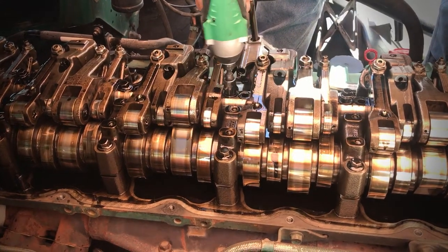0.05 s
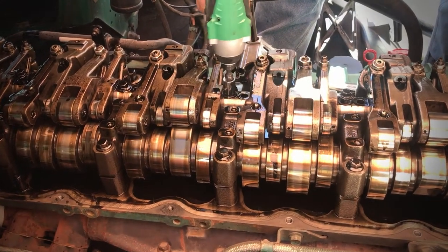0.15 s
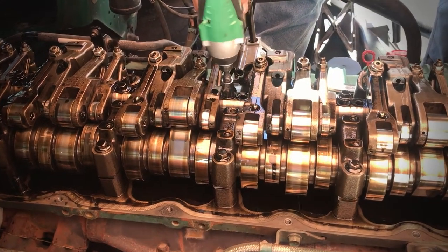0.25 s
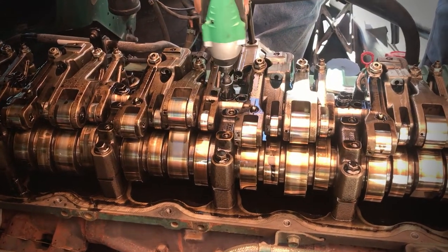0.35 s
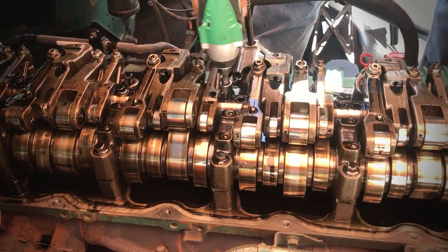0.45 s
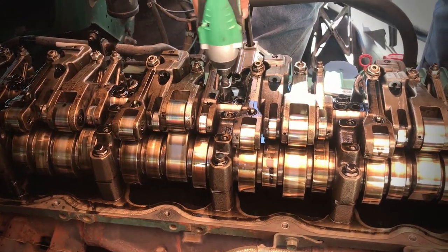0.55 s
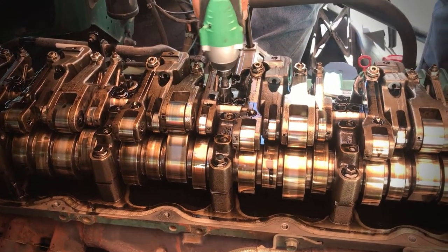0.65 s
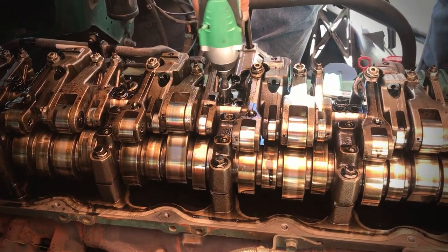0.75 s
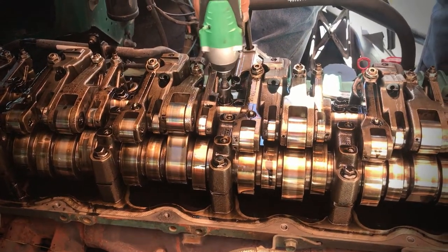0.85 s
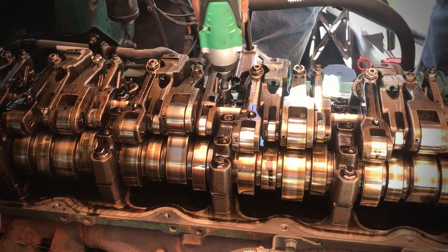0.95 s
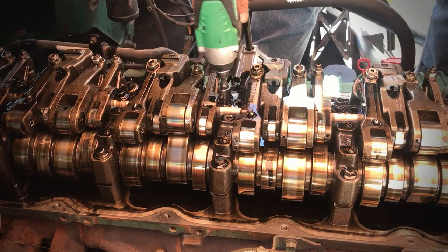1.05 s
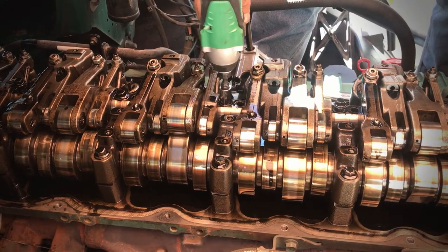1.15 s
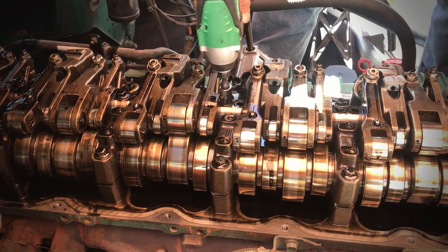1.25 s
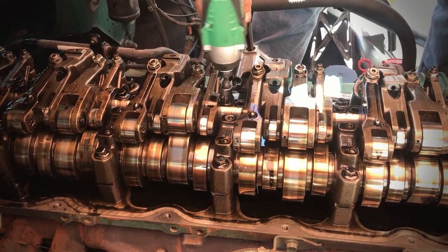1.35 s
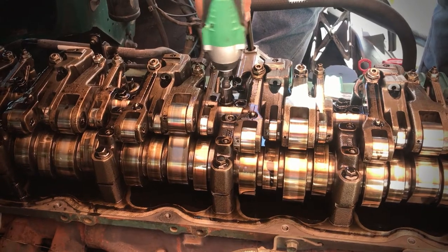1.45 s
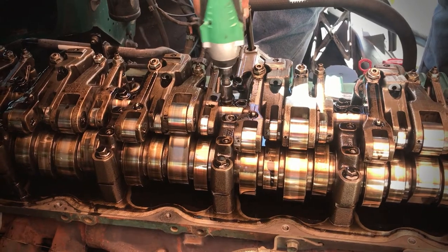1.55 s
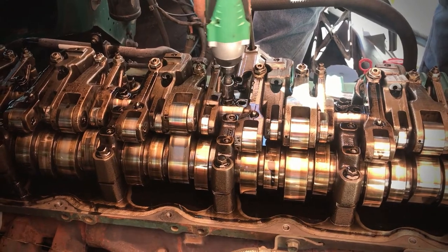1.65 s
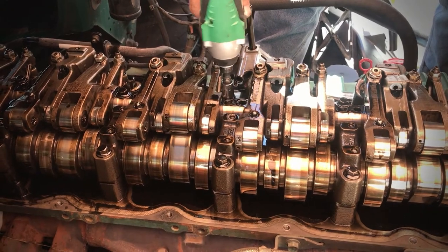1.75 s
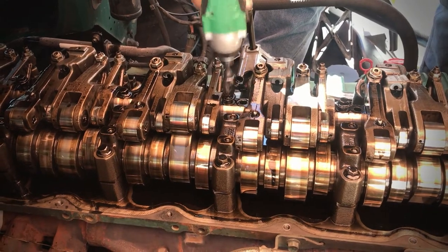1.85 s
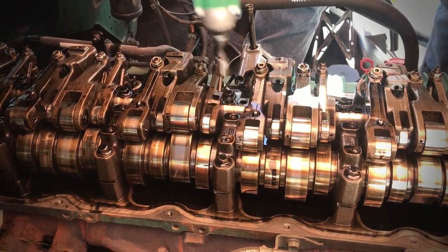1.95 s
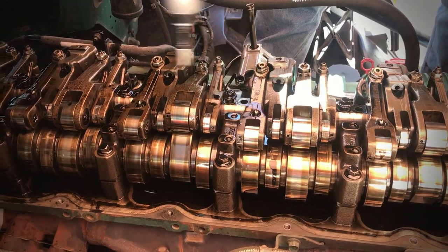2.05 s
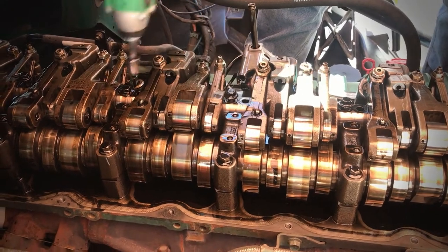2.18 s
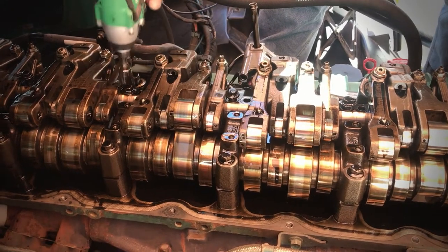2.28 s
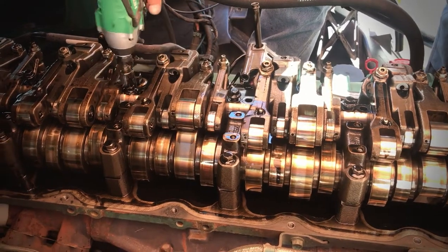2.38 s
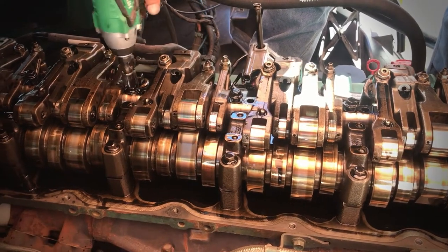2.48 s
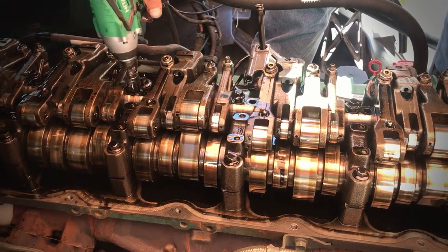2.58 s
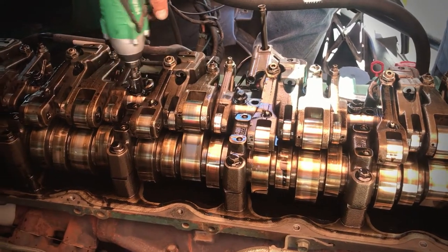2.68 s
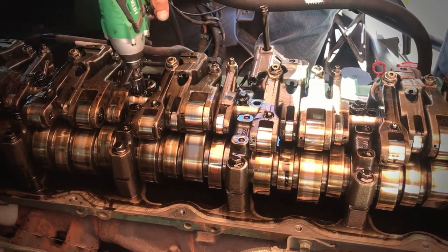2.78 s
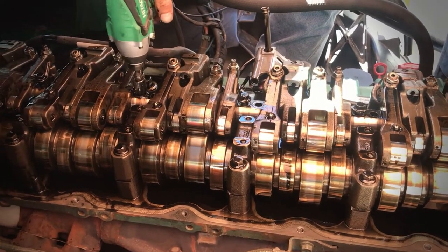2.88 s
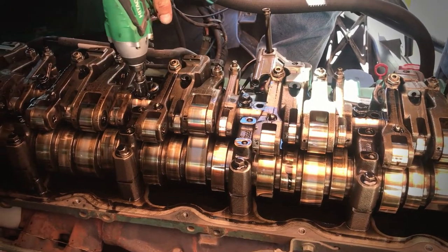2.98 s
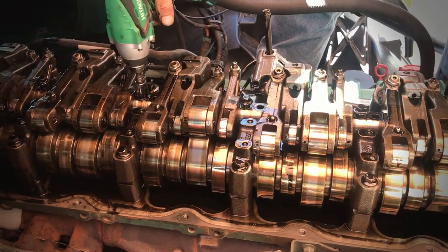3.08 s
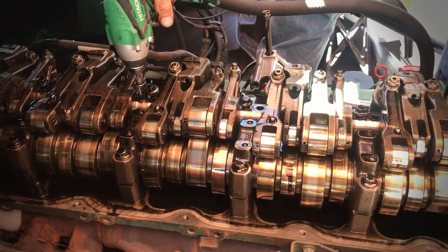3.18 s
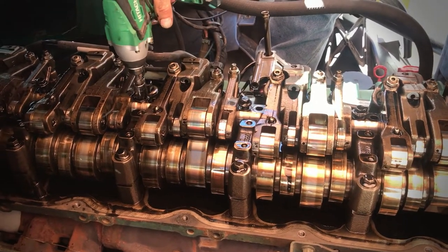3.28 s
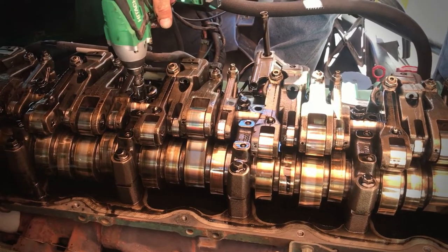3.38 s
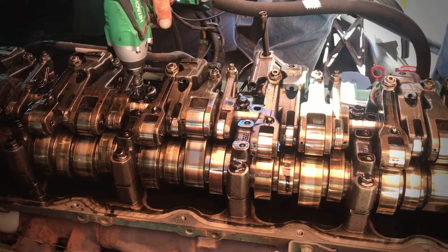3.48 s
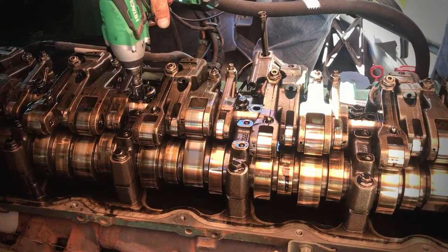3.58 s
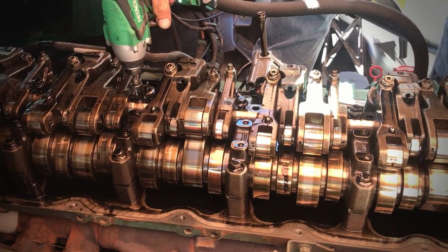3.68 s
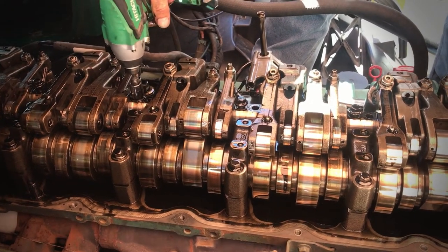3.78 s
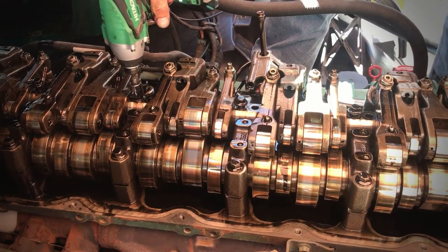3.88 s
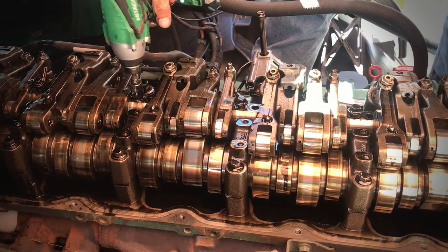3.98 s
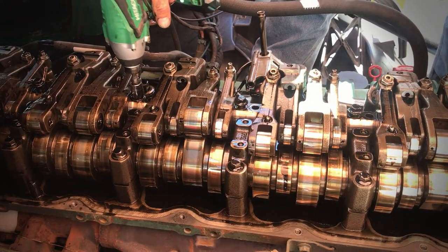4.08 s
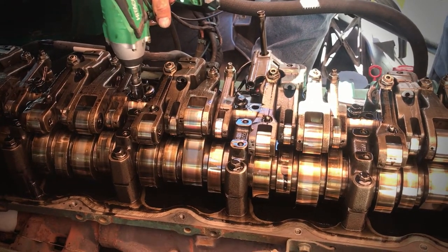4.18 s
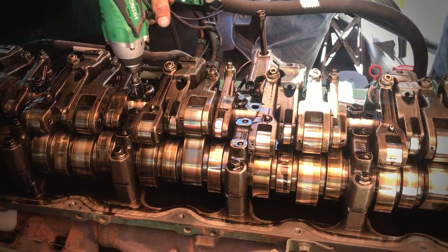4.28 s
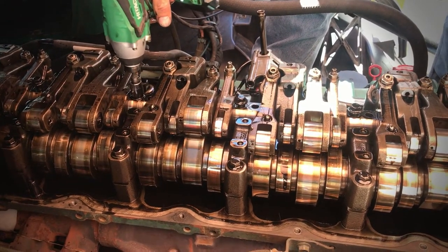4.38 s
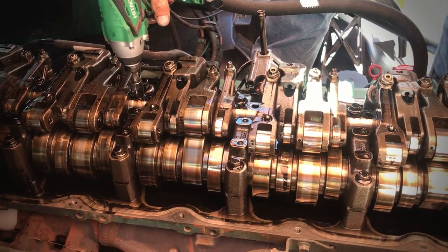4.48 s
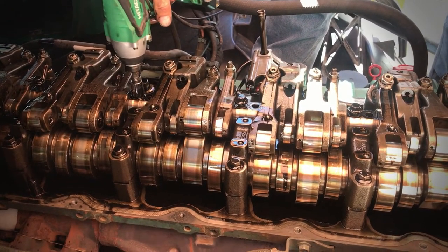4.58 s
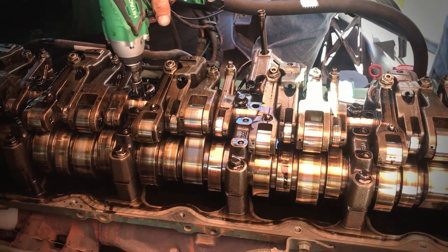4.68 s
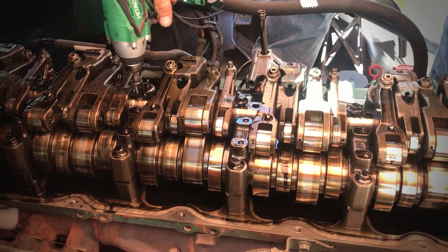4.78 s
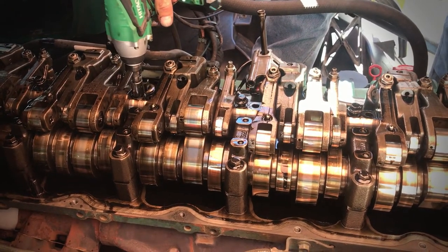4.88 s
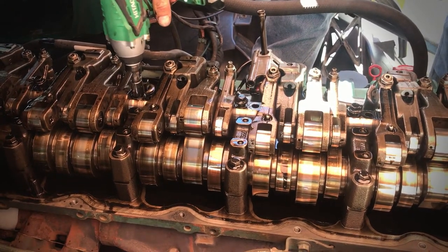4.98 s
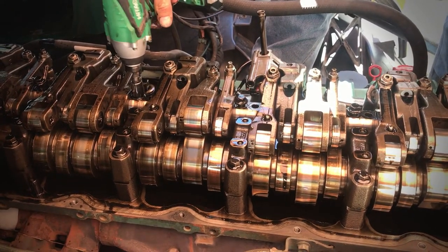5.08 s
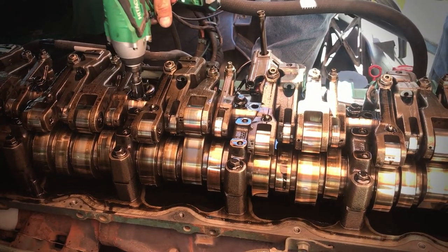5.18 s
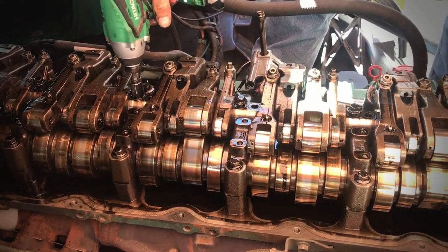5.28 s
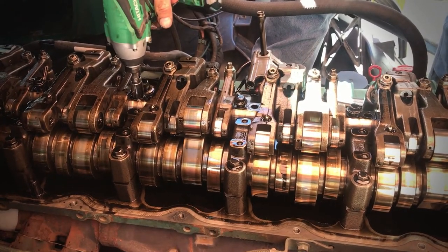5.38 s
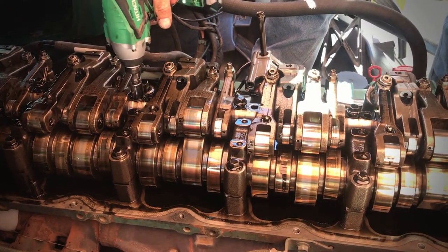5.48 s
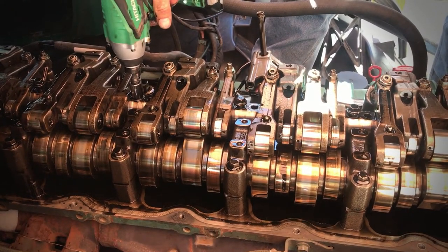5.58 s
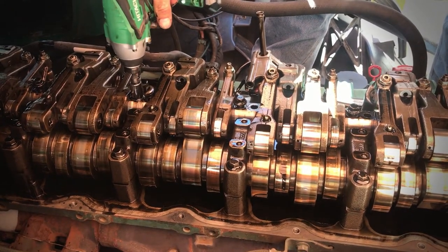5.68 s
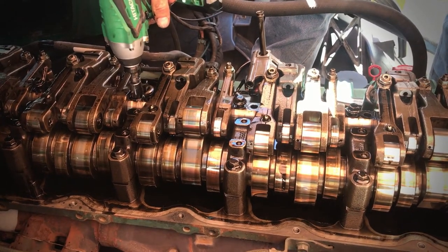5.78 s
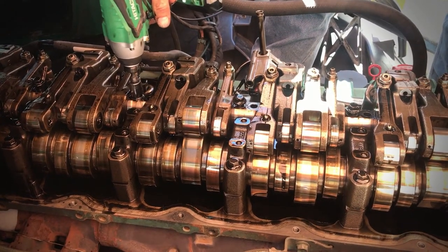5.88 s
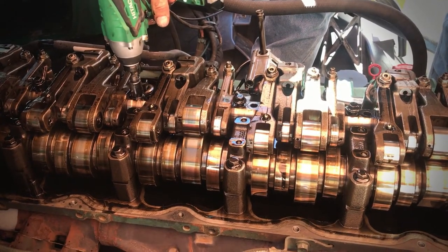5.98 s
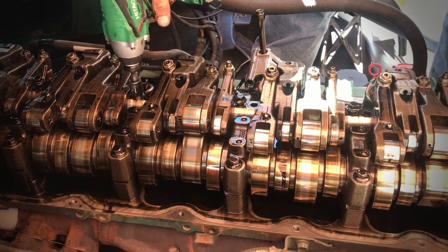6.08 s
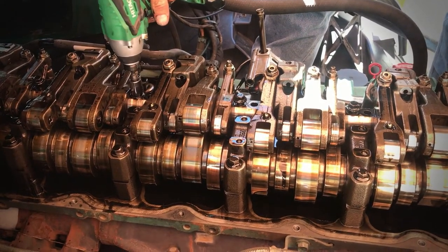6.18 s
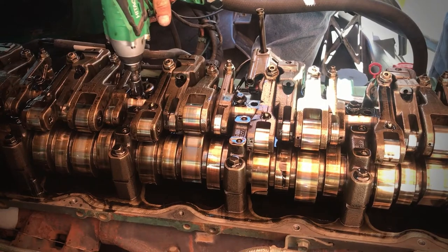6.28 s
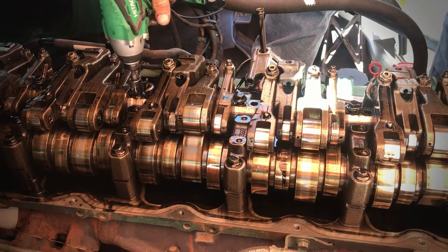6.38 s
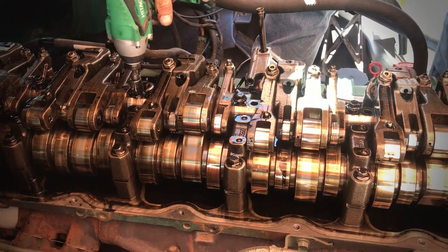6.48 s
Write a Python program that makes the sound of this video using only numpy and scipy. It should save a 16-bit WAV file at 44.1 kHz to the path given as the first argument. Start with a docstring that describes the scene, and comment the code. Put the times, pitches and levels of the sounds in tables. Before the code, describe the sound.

An impact wrench loosens two steel bolts on an engine, heard from nearby. A quick rev and socket rattle lead into several short bursts of fast, ringing hammering and a free whirr that winds down. The socket clinks onto the next bolt, and the hammering resumes in bursts and longer stretches. Occasional low thumps overload the microphone, above a quiet workshop rumble and hush.

```python
"""A short motor rev and the clatter of a loose socket open into the hammering of a cordless impact wrench.
It loosens two bolts on the open head of a diesel engine, above the low rumble of a workshop.
Each trigger pull spins up the motor; the hammer then strikes about 45 times a second, the socket
rebounds on the bolt head, and every contact excites the damped modes of the steel.
The first bolt spins free, the socket clinks over to the second, and a long run follows."""
import sys
import numpy as np
from scipy import signal
from scipy.fft import rfft, irfft
from scipy.io import wavfile
from scipy.ndimage import uniform_filter1d

SR = 44100
rng = np.random.default_rng(int(sys.argv[2]) if len(sys.argv) > 2 else 0)


def wav_out(sig):
    """Save sig, one row per channel (or a flat mono array), as 16-bit PCM at SR to the path in sys.argv[1]."""
    wavfile.write(sys.argv[1], SR, np.round(np.clip(np.atleast_2d(sig).T, -1, 1) * 32767).astype(np.int16))


N = 288795
TIME = np.arange(N) / SR
TAIL = int(.3 * SR)   # samples in the sound of one contact
TAIL_TIME = np.arange(TAIL) / SR
CUTOFF_HZ = 15950

# Trigger pulls under load. Each row: time at full speed and time of release in seconds, whirr level in dB.
TRIGGER_PULLS = [(0.318, 0.415, -22), (0.566, 0.705, -21), (0.779, 0.933, -22), (1.057, 1.23, -25.5),
                 (1.324, 1.452, -24.5), (2.642, 2.69, -36), (2.849, 2.948, -16), (3.082, 3.257, -19.5),
                 (3.362, 3.559, -22), (3.633, 4.977, -23.5), (5.066, 5.221, -20.5), (5.321, 5.429, -19.5),
                 (5.57, 6.6, -26)]
# Unbroken bursts of hammering. Each row: first and last blow in seconds, force in dB.
HAMMER_BURSTS = [(0.347, 0.42, 2), (.562, .61, -2.5), (0.634, 0.703, -0.5), (.801, 0.846, -2),
                 (.87, 0.913, -1), (1.072, 1.144, -0.5), (1.166, 1.203, -1), (1.351, 1.368, 4),
                 (1.396, 1.419, -1.5), (2.871, 2.939, 3), (3.081, 3.255, 1), (3.385, 3.553, 1.5),
                 (3.7, 3.873, -.5), (3.908, 3.99, 0), (4.012, 4.122, 0), (4.151, 4.192, -2.5),
                 (4.225, 4.271, -2.5), (4.293, 4.441, 0), (4.471, 4.697, -2.5), (4.733, 4.952, 1),
                 (5.055, 5.103, 0), (5.123, 5.212, 0), (5.329, 5.4, 1), (5.416, 5.458, -0.5),
                 (5.581, 5.787, .5), (5.855, 6.132, -.5), (6.156, 6.348, -0.5), (6.374, 6.463, -3.5),
                 (6.481, 6.54, -2)]
# Spectrum of the gear whirr. Each row: frequency in Hz, relative level in dB.
GEAR_SPECTRUM = [(100, -31), (450, -10), (800, 2.5), (1300, 11.5), (2200, 1.5), (3800, 3), (6000, -1.5),
                 (10000, -8.5), (16000, -16.5)]


def from_db(db):
    """Amplitude grows tenfold with every 20 dB."""
    return 10 ** (np.asarray(db) / 20)


def decay(t60):
    """Exponential damping: a fall of 60 dB in t60 seconds."""
    return 1000 ** (-TAIL_TIME / t60)


def add(track, s, sound):
    """Superposition: a sound adds to the track from s seconds on."""
    start = int(np.clip(s * SR, 0, N - 1))
    track[start:start + len(sound)] += sound[:N - start]


def colour(x, spectrum, modes=(), tilt_db=0):
    """Source and filter: a smooth spectrum with resonance peaks and a tilt per octave, at unit power."""
    size = 8192
    hz = np.maximum(np.fft.rfftfreq(size, 1 / SR), 1)
    points, levels = np.transpose(spectrum)
    db = np.interp(np.log(hz), np.log(points), levels) + tilt_db * np.log2(hz)
    db += sum(lift / (1 + (2 * (hz - centre) / width) ** 2) for centre, width, lift in modes)
    gain = from_db(db) / np.sqrt(np.mean(from_db(db[hz < CUTOFF_HZ]) ** 2))
    cepstrum = irfft(np.log(gain))[:size // 2]
    cepstrum[1:] *= 2   # minimum phase: nothing rings before its cause
    response = irfft(np.exp(rfft(cepstrum, size)))[:size // 2]
    return signal.fftconvolve(x, response)[:N]


def workshop(rumble_gain_db, bump_db, hush_db):
    """Filtered noise: a low rumble and the room's hush; handling the tool adds a rustle and a bump."""
    # Course of the rumble. Each row: time in seconds, relative level in dB.
    rumble_course = [(0.0, -40), (0.07, -28.5), (0.36, -44.5), (0.87, -44.5), (1.66, -45), (1.88, -40.5),
                     (2.68, -41), (3.21, -54), (3.43, -64), (3.94, -46), (4.07, -67), (5.62, -54),
                     (6.16, -49), (6.55, -47)]
    # Spectra of the rumble and of the rustle and hush. Each row: frequency in Hz, relative level in dB.
    rumble_spectrum = [(15, -39), (25, -10), (43, -4.5), (114, -2), (172, -12.5), (274, -18), (299, -20),
                       (394, -13), (500, -37), (650, -88), (1100, -120)]
    rustle_spectrum = [(150, -4), (400, 0), (700, -3.5), (1200, -4), (2500, -10.5), (5000, -15.5),
                       (9000, -26), (16000, -35.5)]
    # Shifts of the tool. Each row: middle and half length in seconds, level in dB.
    shifts = [(0.046, 0.067, -25), (1.8, 0.041, -39), (2.259, 0.039, -45), (5.548, 0.074, -40)]
    handling = sum(from_db(db) * np.exp(-((TIME - s) / half_s) ** 2) for s, half_s, db in shifts)
    rumble_db = np.interp(TIME, *np.transpose(rumble_course)) + rumble_gain_db
    low_level = from_db(rumble_db) + from_db(bump_db) * handling
    rumble = low_level * colour(rng.standard_normal(N), rumble_spectrum)
    rustle = (from_db(hush_db) + handling) * colour(rng.standard_normal(N), rustle_spectrum)
    return rumble + rustle


def loaded_motor(spin_up_s, coast_s, turn_hz, throb):
    """Amplitude modulation: the whirr of gears and socket swells with speed and throbs with each turn."""
    level = np.zeros(N)
    for on, off, db in TRIGGER_PULLS:
        fade = np.maximum(on - TIME, 0) / spin_up_s + np.maximum(TIME - off, 0) / coast_s
        level = np.maximum(level, from_db(db) * np.exp(-np.minimum(fade, 20)))
    throbbing = 1 + throb * np.sin(2 * np.pi * turn_hz * TIME)
    return colour(rng.standard_normal(N) * level * throbbing, GEAR_SPECTRUM)


def free_motor(mesh_hz, spin_up_s, coast_s, wobble, steepness, whirr_tilt_db):
    """Gear meshing: partials follow the speed, roughened by tooth play; the level grows steeply with it."""
    # Unloaded revs. Each row: pull and release in seconds, whine and whirr levels at full speed in dB.
    revs = [(0.003, 0.145, -37, -25), (1.505, 1.681, -28.5, -22)]
    # Partials of the whine. Each row: multiple of the mesh rate, relative level in dB.
    gear_orders = [(0.669, -12), (1, -3.5), (1.33, -16), (2, -11), (2.668, 1.5), (2.999, -5.5), (3.999, -8)]
    speed, whine_level, whirr_level, whine = np.zeros((4, N))
    for on, off, whine_db, whirr_db in revs:
        driven_s = np.maximum(np.minimum(TIME, off) - on, 0)
        rev = (1 - np.exp(-driven_s / spin_up_s)) * np.exp(-np.maximum(TIME - off, 0) / coast_s)
        speed += rev
        whine_level += from_db(whine_db) * rev ** steepness
        whirr_level += from_db(whirr_db) * rev ** steepness
    for multiple, order_db in gear_orders:
        play = uniform_filter1d(rng.standard_normal(N), size=80)
        hz = multiple * mesh_hz * speed * (1 + wobble * play / play.std())
        whine += from_db(order_db) * np.sin(2 * np.pi * np.cumsum(hz) / SR)
    whirr = colour(rng.standard_normal(N) * whirr_level, GEAR_SPECTRUM, tilt_db=whirr_tilt_db)
    return whine * whine_level + whirr


def blows(bursts, rate_hz=46.5, sag_db_per_s=10, ease_db=5, ease_s=.03):
    """An impulse train of (seconds, dB), weakening as the bolt gives and around each trigger release."""
    releases, out = np.array(TRIGGER_PULLS)[:, 1], []
    for first, last, db in bursts:
        for s in np.linspace(first, last, round((last - first) * rate_hz) + 1):
            easing = np.exp(-np.abs(releases - s).min() / ease_s)
            out.append((s, db - sag_db_per_s * (s - first) - ease_db * easing))
    return out


def thumps(sweep_hz, glide_s, lead_s, rise_s, fall_s, light_db, spread_db):
    """Downward chirps: short thumps whose highs arrive first, faint at every blow and loud at a few."""
    # Loud low falling thumps of the overloaded recorder, at scattered blows.
    # Each row: time in seconds, level in dB.
    loud = [(.35, -13.5), (.875, -17.5), (1.152, -18.5), (1.427, -23.5), (3.155, -21.5), (3.478, -22),
            (4.059, -25), (4.583, -21), (4.628, -21), (5.906, -16.5), (5.927, -22.5), (6.059, -26),
            (6.286, -20), (6.308, -18), (6.33, -15.5)]
    light = [(s, db + light_db + rng.uniform(-spread_db, spread_db)) for s, db in blows(HAMMER_BURSTS)]
    out, t = np.zeros(N), TAIL_TIME
    cycles = sweep_hz * glide_s * (1 - np.exp(-t / glide_s)) + 42.5 * t   # dives towards 42.5 Hz
    rise = np.exp(-((t - lead_s) / rise_s) ** 2)
    fall = np.exp(-np.abs(t - lead_s) / fall_s)
    thump = np.where(t < lead_s, rise, fall) * np.sin(2 * np.pi * cycles)
    for s, db in loud + light:
        add(out, s - lead_s, from_db(db) * thump)
    return out


def casing():
    """Periodic excitation: every blow shakes the tool's casing in the same way, giving a low buzz."""
    # Low modes of the casing. Each row: frequency in Hz, level in dB, 60 dB decay time in seconds.
    modes = [(287, -47, 0.18), (418, -41.5, 0.13), (707.4, -32.5, 0.078)]
    knock = sum(from_db(db) * decay(t60) * np.sin(2 * np.pi * hz * TAIL_TIME) for hz, db, t60 in modes)
    out = np.zeros(N)
    for s, _ in blows(HAMMER_BURSTS):
        add(out, s, knock)
    return out


def clanks():
    """Free vibration: socket and head ring in short, clear tones when they meet."""
    # Damped tones. Each row: start in seconds, frequency in Hz, level in dB, 60 dB decay time in seconds.
    tones = [(0.075, 1232, -16, 0.064), (1.781, 510, -32, 0.12), (1.779, 2900, -23, 0.055),
             (2.468, 933, -16.5, 0.033), (2.619, 3630, -25, 0.04), (2.627, 5400, -30, 0.046),
             (2.675, 997, -18, 0.036), (3.634, 1020, -6, 0.034), (3.725, 1273, -9, .09)]
    out, attack = np.zeros(N), 1 - decay(.013)
    for s, hz, db, t60 in tones:
        add(out, s, from_db(db) * attack * decay(t60) * np.sin(2 * np.pi * hz * TAIL_TIME))
    return out


def patchy(noise, patchy_db):
    """Modal weighting: each contact lands a little differently and so favours other bands."""
    knots_hz = np.geomspace(300, 16000, 24)
    knots_db = patchy_db * rng.standard_normal(len(knots_hz))
    gain = from_db(np.interp(np.fft.rfftfreq(TAIL, 1 / SR), knots_hz, knots_db))
    return irfft(rfft(noise) * gain / np.sqrt(np.mean(gain ** 2)), TAIL)


def steel(contacts, spectrum, modes, ring_t60, ring_db, room_t60, room_db,
          crack_tilt_db, ring_tilt_db, alike, patchy_db, crack_t60=.011):
    """Impact response: each contact gives a bright crack, a ring of dense modes and a short room tail."""
    cracks, rings = np.zeros((2, N))
    dense_modes = rng.standard_normal(TAIL)
    crack = decay(crack_t60) * (1 - decay(.0022))
    ring = from_db(ring_db) * decay(ring_t60) + from_db(room_db) * decay(room_t60)
    ring *= 1 - decay(crack_t60)   # builds as the crack dies
    for s, db, crack_db in sorted(contacts):
        # The modes shift as the socket creeps round.
        dense_modes = np.sqrt(alike) * dense_modes + np.sqrt(1 - alike) * rng.standard_normal(TAIL)
        add(cracks, s, from_db(db + crack_db) * crack * patchy(rng.standard_normal(TAIL), 2 * patchy_db))
        add(rings, s, from_db(db) * ring * patchy(dense_modes, patchy_db))
    return colour(cracks, spectrum, modes, crack_tilt_db) + colour(rings, spectrum, modes, ring_tilt_db)


def loose_socket(touches, gap_s, loss_db):
    """Inelastic collisions: the socket knocks singly, or rattles to rest after a free rev."""
    # Knocks and first touches of rattles. Each row: start in seconds, level in dB, crack offset in dB.
    knocks = [(.065, -5.5, 0), (.075, -8, -6), (.092, 0, -19), (.136, -10, -8), (.141, -3, 3),
              (.306, -6.5, -2), (.327, -2.5, 2), (.782, -9, -7), (1.04, -16, -3), (1.061, -13.5, 9.5),
              (1.228, -14.5, 8), (1.33, -5.5, -16), (1.474, -11.5, 7), (1.507, -17.5, 4.5),
              (1.777, -12, -8), (1.931, -22.5, -3.5), (2.456, -15, -4), (2.469, -17.5, 3), (2.619, -23, -6),
              (2.667, -21.5, -1), (2.85, -4.5, -8), (3.06, -13, -18), (3.36, -3.5, -17), (3.603, -14, 1),
              (3.609, -5, 3.5), (3.632, -11, 10), (3.65, -4, -1), (3.678, -2, -3), (5.043, -12, -16),
              (5.552, -28, 3), (5.816, -5.5, 0)]
    rattles = [(0.164, -9, 0), (1.788, -25, -15)]
    return knocks + [(s + k * gap_s, db - k * loss_db, crack_db)
                     for s, db, crack_db in rattles for k in range(touches)]


def hammer(bursts, jitter_s, uneven_db, rebound_s, rebound_db, settle_s, settle_db, scatter):
    """Elastic rebound: after each contact of hammer and anvil, the socket bounces once, then settles."""
    contacts = []
    times, forces = np.transpose(blows(bursts))
    run_ups = np.interp(np.diff(times, prepend=0), [.024, .035], [0, 1])
    for s, db, run_up, chance in zip(times, forces, run_ups, rng.standard_normal((len(times), 6))):
        # After a pause the blow is 2.5 dB harder and free of jitter.
        s += (1 - run_up) * jitter_s * chance[0]
        contacts.append((s, db + 2.5 * run_up + (1 - run_up) * uneven_db * chance[1], 0))
        for delay_s, offset_db, (timing, force) in [(rebound_s, rebound_db, chance[2:4]),
                                                    (settle_s, settle_db, chance[4:])]:
            contacts.append((s + delay_s * np.exp(scatter * timing), db + offset_db + uneven_db * force, 0))
    return contacts


def bolts(second_bolt_s):
    """Resonance: socket, bolt and head filter the impacts, with different modes on each bolt."""
    # Impact spectrum on each bolt. Each row: frequency in Hz, relative level in dB.
    first_spectrum = [(60, -7.5), (250, -26), (500, -8.5), (750, -2.5), (1050, 7), (1600, -1), (2200, -2),
                      (3000, -3), (4100, 5.5), (5500, -7.5), (9000, -4.5), (10500, -10), (13000, -5.5),
                      (16000, -13)]
    second_spectrum = [(60, -36.5), (250, -21), (400, -10), (580, -14), (800, -11), (970, 4.5),
                       (1250, -0.5), (1550, -9), (2300, -6), (4100, -6), (7300, -11), (9300, -6.5),
                       (10600, -14.5), (16000, -15.5)]
    # Resonances on each bolt. Each row: frequency in Hz, bandwidth in Hz, lift in dB.
    first_modes = [(1105, 13, 5), (1520, 64, 6.5), (1700, 96, 5.5), (3150, 200, 4.5), (4160, 120, 0),
                   (6630, 290, 4), (9120, 90, 5.5), (12900, 90, -23)]
    second_modes = [(724, 27, 9), (1234, 195, 5.2), (1748, 370, 10.1), (2780, 430, 3.7), (3940, 840, 5.2),
                    (4600, 150, 6.1), (5370, 59, 1.8), (5600, 300, 4.5), (6250, 450, 3.4), (9780, 210, 3.8),
                    (11460, 100, 4.7), (11620, 360, 7.3), (13060, 730, 7.2)]
    first = hammer([b for b in HAMMER_BURSTS if b[0] < second_bolt_s], jitter_s=.0007, uneven_db=2.2,
                   rebound_s=.0055, rebound_db=-5, settle_s=.0105, settle_db=-3.5, scatter=.25)
    second = hammer([b for b in HAMMER_BURSTS if b[0] >= second_bolt_s], jitter_s=.0003, uneven_db=2.18,
                    rebound_s=.0058, rebound_db=-5.5, settle_s=.0108, settle_db=-4, scatter=.22)
    knocks = loose_socket(touches=7, gap_s=.0145, loss_db=2.5)
    first += [k for k in knocks if k[0] < second_bolt_s]
    second += [k for k in knocks if k[0] >= second_bolt_s]
    first_bolt = steel(first, first_spectrum, first_modes, ring_t60=.039, ring_db=-3.5, room_t60=.15,
                       room_db=-23.5, crack_tilt_db=3, ring_tilt_db=.34, alike=.43, patchy_db=2.5)
    second_bolt = steel(second, second_spectrum, second_modes, ring_t60=.045, ring_db=-7.5, room_t60=.094,
                        room_db=-22, crack_tilt_db=4, ring_tilt_db=.1, alike=.46, patchy_db=2)
    return first_bolt + second_bolt


def scene():
    """Superposition: the nearby wrench and the workshop sum in one channel."""
    drive = loaded_motor(spin_up_s=.0093, coast_s=.021, turn_hz=91.5, throb=.21)
    revving = free_motor(mesh_hz=1580, spin_up_s=.037, coast_s=.145,
                         wobble=.028, steepness=4.85, whirr_tilt_db=2.4)
    low = thumps(sweep_hz=1290, glide_s=.00297, lead_s=.00551, rise_s=.0042, fall_s=.0057,
                 light_db=-40.5, spread_db=13.5)
    impacts = bolts(second_bolt_s=2) + casing() + clanks()
    background = workshop(rumble_gain_db=3.2, bump_db=-8.5, hush_db=-46.5)
    return (background + drive + revving + low + impacts)[None]


def limiter(x, threshold_db, release_db_per_s):
    """Gain control: the gain drops at once when the short-term level passes a threshold, then recovers."""
    level_db = 10 * np.log10(np.maximum(uniform_filter1d(x ** 2, size=130), 1e-12))
    excess_db = np.maximum(level_db - threshold_db, 0)
    recovery_db = release_db_per_s * TIME
    cut_db = np.maximum.accumulate(excess_db + recovery_db, axis=-1) - recovery_db
    return x * from_db(-uniform_filter1d(cut_db, size=40))


def record(dry):
    """Limiting evens the blows, saturation rounds the hardest peaks, and filters cut deep bass and top."""
    ceiling = .78
    held = limiter(dry, threshold_db=-6.5, release_db_per_s=136)
    rounded = held / (1 + (held / ceiling) ** 4) ** .25
    bass_cut = signal.sosfilt(signal.butter(3, 36, "high", fs=SR, output="sos"), rounded)
    return signal.sosfilt(signal.ellip(12, .2, 70, CUTOFF_HZ, fs=SR, output="sos"), bass_cut)


dry = scene()
out = record(dry)
wav_out(out)
```